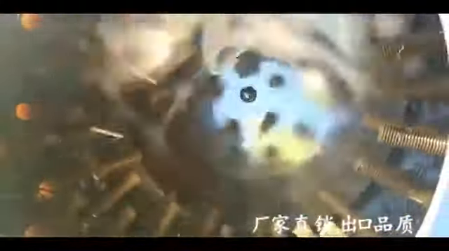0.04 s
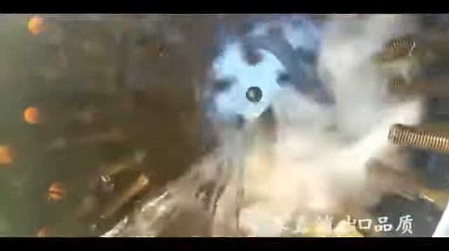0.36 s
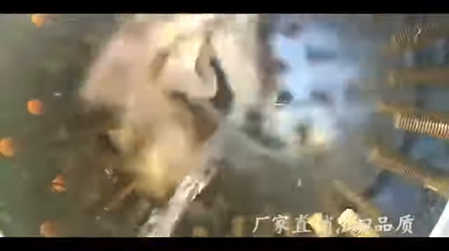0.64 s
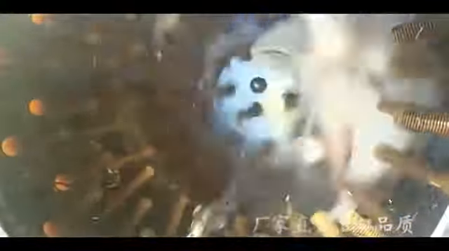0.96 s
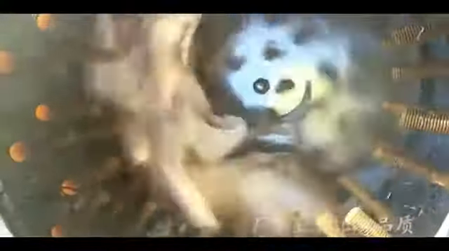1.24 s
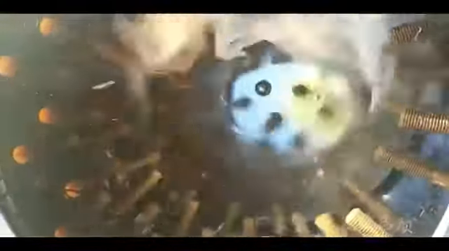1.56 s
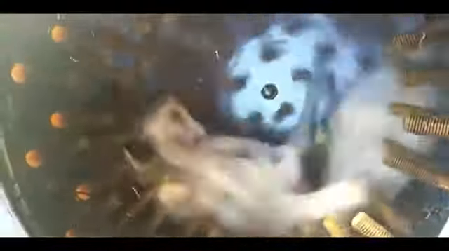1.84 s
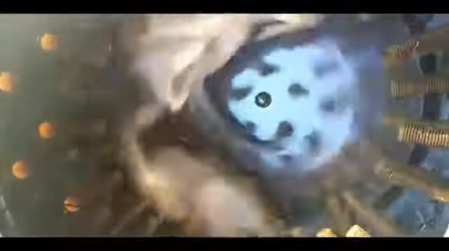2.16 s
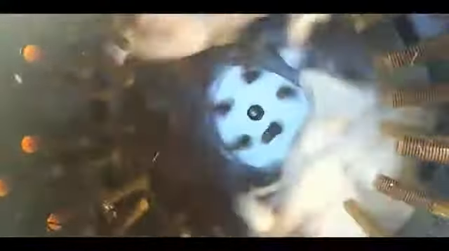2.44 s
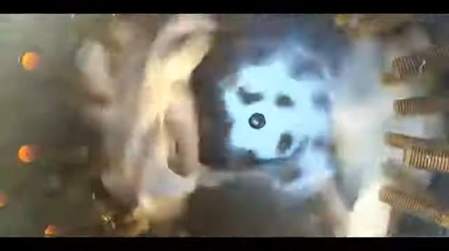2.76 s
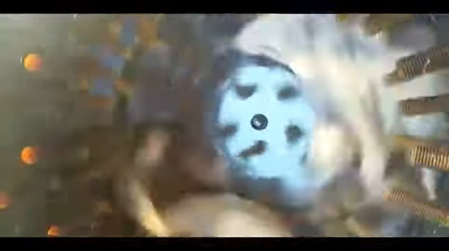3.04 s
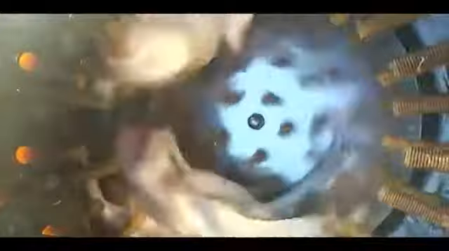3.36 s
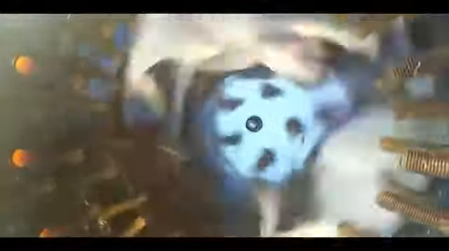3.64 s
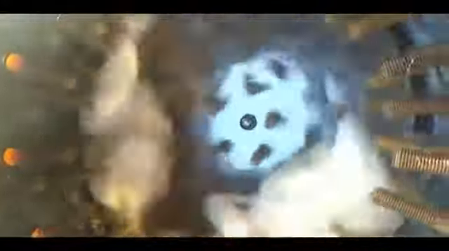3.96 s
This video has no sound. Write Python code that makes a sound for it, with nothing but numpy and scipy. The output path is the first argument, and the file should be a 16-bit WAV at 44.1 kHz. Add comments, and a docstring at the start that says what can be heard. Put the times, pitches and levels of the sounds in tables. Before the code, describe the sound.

A poultry plucker drum spins close by with a throbbing hum and low rumble. Rubber fingers patter and squelch on wet carcasses while water hisses and splats. A knock and brief rubbery groan come near 0.3 seconds, then irregular bumps against the wall. From about 1.8 seconds a hollow, wavering ring grows stronger amid sharp wet smacks. Bumps crowd in again from 2.8 seconds until everything stops at 3.9.

```python
"""Poultry plucker at full speed

Heard from just above the open drum, as the spinning plate throws wet carcasses against rubber fingers.
The drum booms with a throbbing hum and a hollow ring; the fingers patter, squelch and smack on skin,
bodies bump the wall, and water sprays and splats. A limiter holds the peaks; the sound stops dead."""
import sys
import numpy as np
from scipy import signal
from scipy.fft import rfft, irfft, next_fast_len
from scipy.io import wavfile
from scipy.ndimage import uniform_filter1d, minimum_filter1d

SR = 44100
rng = np.random.default_rng(int(sys.argv[2]) if len(sys.argv) > 2 else 0)


def int16_out(signal):
    """Quantize to a 16-bit WAV file."""
    q = np.round(np.clip(np.atleast_2d(signal).T, -1, 1) * 32767)
    wavfile.write(sys.argv[1], SR, q.astype(np.int16))


N = 176400
TIME = np.arange(N) / SR

# How hard the fingers slap. Each row: time in seconds, relative level in dB.
SLAP_FORCE = [(0, -24.5), (.24, -25), (.34, -24), (.42, -23), (.54, -22), (.64, -29.5), (.78, -36),
              (1.06, -18), (1.15, -39), (1.33, -31), (1.5, -24.5), (1.7, -28), (1.97, -22), (2.27, -26),
              (2.44, -22.5), (2.53, -15), (2.68, -25), (2.8, -17.5), (2.93, -24), (3.17, -18.5),
              (3.3, -18.5), (3.42, -22.5), (3.53, -18), (3.88, -26.5)]
# How hard the water splashes off them. Each row: time in seconds, relative level in dB.
SPLASH_FORCE = [(0, -27.5), (.24, -32), (.35, -28.5), (.6, -27), (1.06, -28), (1.18, -30.5), (1.55, -26),
                (1.72, -30.5), (1.97, -26.5), (2.25, -29.5), (2.75, -30), (2.95, -33.5), (3.1, -32),
                (3.27, -32), (3.88, -30)]


def from_db(db):
    """Decibels to gain."""
    return 10 ** (np.asarray(db) / 20)


def rms_one(x):
    """Scale to unit rms."""
    return x / np.sqrt(np.mean(x ** 2) + 1e-20)


def fader(rows):
    """A gain ride through (seconds, dB) points, centred on its mean level."""
    db = np.interp(TIME, *np.transpose(rows))
    return from_db(db - db.mean())


def drift(rate_hz):
    """A smooth random wander with an rms of about 1."""
    step = 40
    pole = np.exp(-2 * np.pi * rate_hz * step / SR)
    noise = rng.standard_normal(N // step + 2002)
    slow = signal.lfilter([1], [1, -2 * pole, pole * pole], noise)[2000:]
    return np.interp(np.arange(N) / step, np.arange(len(slow)), rms_one(slow))


def tone(hz):
    """A sine that follows a pitch curve."""
    return np.sin(2 * np.pi * np.cumsum(hz) / SR)


def coloured(x, colour):
    """Minimum-phase EQ through (Hz, dB) points; keeps the power of white noise."""
    size = next_fast_len(N + SR // 4)
    hz, db = np.transpose(colour)
    bin_hz = np.arange(size // 2 + 1) * SR / size
    gain = rms_one(from_db(np.interp(np.log(bin_hz + 1), np.log(hz), db)))
    cepstrum = irfft(np.log(gain), size)
    cepstrum[1:size // 2] *= 2
    cepstrum[size // 2 + 1:] = 0
    return irfft(rfft(x, size) * np.exp(rfft(cepstrum)), size)[:N]


def contacts(per_s, spread_db):
    """Random touches, mostly light and a few harder."""
    sizes = from_db(spread_db * np.minimum(rng.exponential(1, N), 4))
    return sizes * (rng.random(N) < per_s / SR)


def ringing(hits, modes):
    """Every hit excites each resonance with a strength of its own."""
    out = 0
    for hz, width, db in modes:
        band = signal.butter(1, [hz - width / 2, hz + width / 2], "band", fs=SR, output="sos")
        skirt = signal.butter(1, [hz / np.sqrt(2), hz * np.sqrt(2)], "band", fs=SR, output="sos")
        strikes = hits * rng.standard_normal(N) + 1e-18
        out = out + from_db(db) * rms_one(signal.sosfilt(np.vstack([band, skirt]), strikes))
    return out


def tails(hits, decay_s):
    """Envelope of overlapping, decaying hits; rms 1."""
    power = signal.lfilter([1], [1, -np.exp(-2 / (decay_s * SR))], hits ** 2 + 1e-18)
    return rms_one(np.sqrt(power))


def burst(start, attack_s, decay_s, length=N):
    """Envelope of one blow; peak 1."""
    age = np.maximum(TIME[:length] - start, 0)
    return np.minimum(age / attack_s, 1) * np.exp(-np.maximum(age - attack_s, 0) / decay_s)


def add(out, start_s, sound):
    """Mix a sound in at a time."""
    start = max(int(start_s * SR), 0)
    out[start:start + len(sound)] += sound[:max(N - start, 0)]


def drum():
    """Fingers beat the load and the drum booms; carcasses knock its wall, over a low rumble."""
    # Resonances of the drum and of its wall. Each row: pitch in Hz, width in Hz, level in dB.
    boom_modes = [(129, 29, -23.5), (151.3, 35.5, -20), (190, 19, -20.5), (271.8, 47, -21),
                  (333, 245, -25.5)]
    wall_modes = [(448.2, 39, -28.5), (487.8, 50, -36), (589, 71, -28.5), (685, 56, -29), (903, 61, -34),
                  (1119, 27, -40), (1335, 14, -42.5)]
    # How hard the wall is knocked. Each row: time in seconds, relative level in dB.
    knock_force = [(0, -13.5), (.18, -16.5), (.27, -26), (.36, -2.5), (.42, -18.5), (.62, -14), (.78, -16),
                   (1.1, -13), (1.4, -16), (1.58, -19), (1.66, -11.5), (2.0, -19), (2.25, -14), (2.6, -18),
                   (2.69, -21.5), (2.8, -12.5), (3.16, -15), (3.27, -27), (3.4, -22), (3.65, -20),
                   (3.88, -8.5)]
    # The rumble's EQ. Each row: frequency in Hz, relative level in dB.
    rumble_eq = [(20, 2), (40, -3), (65, -4.5), (100, 10.5), (200, 18.5), (500, -0.5), (2000, -37)]
    boom = ringing(contacts(per_s=500, spread_db=1), boom_modes)
    wall = ringing(contacts(per_s=420, spread_db=0.1), wall_modes) * fader(knock_force)
    rumble = from_db(-31.5 + 2 * drift(5.6)) * coloured(rng.standard_normal(N), rumble_eq)
    return boom + wall + rumble


def hum(level_db=-15.5, jitter_hz=4, flutter_db=3, half_throb_s=0.018):
    """The drum's note swells and bends each time the load leans on the plate."""
    # Each row is one throb: centre in seconds, pitch in Hz, relative level in dB.
    throbs = [(.005, 175, -0.5), (.072, 150, -3), (.164, 166.7, 1), (.217, 152.2, -5), (.37, 178.9, 1),
              (.422, 169.4, 4), (.504, 151.8, 1.5), (.58, 166.7, -3), (.689, 173.3, 1), (.752, 180.4, -1.5),
              (.834, 171.2, -7), (.884, 154, 0), (0.991, 184, -11), (1.054, 162.7, -6), (1.12, 179.7, 3),
              (1.195, 156.8, -1.5), (1.27, 136, -11), (1.342, 161.4, 4.5), (1.4, 181.6, -2),
              (1.475, 163.5, -2), (1.6, 168.4, 0), (1.69, 178, -1), (1.765, 173.3, 4), (1.85, 183.8, -10.5),
              (1.923, 171.9, -0.5), (2.007, 168, -5), (2.126, 172.5, 1), (2.237, 167.7, 0), (2.3, 180, -11),
              (2.38, 167.3, -0.5), (2.438, 176, -2), (2.506, 178.5, 1), (2.569, 165.5, 1),
              (2.639, 167.6, -5), (2.694, 174.6, -3), (2.763, 146, -1.5), (2.833, 173, -4),
              (2.883, 171.8, 6.5), (2.97, 175.1, 0), (3.058, 167.1, 1), (3.106, 172.1, -5),
              (3.15, 148.2, -2), (3.219, 182.3, -1), (3.266, 164, -1.5), (3.34, 170.6, -3),
              (3.396, 172.2, -2.5), (3.487, 151.6, -2.5), (3.531, 181.4, -3), (3.587, 175.3, 2),
              (3.711, 174, -0.5), (3.787, 170.5, -0.5), (3.835, 138, -0.5)]
    times, hz, _ = np.transpose(throbs)
    pitch = np.interp(TIME, times, hz) + jitter_hz * drift(13.8)
    swells = sum(from_db(db) * np.exp(-.5 * ((TIME - at) / half_throb_s) ** 2) for at, _, db in throbs)
    floor = from_db(-18.5)
    flutter = from_db(flutter_db * drift(10.3))
    return from_db(level_db) * rms_one((floor + swells) * flutter * tone(pitch))


def hollow_ring(jitter_hz=36.2, flutter_db=3.5):
    """The air in the drum rings on an unsteady note that shifts as the carcasses move through it."""
    # Each row: time in seconds, pitch in Hz, level in dB.
    ring_path = [(0, 480, -27), (.3, 490, -22), (.55, 479, -41), (.77, 488, -23), (.95, 493, -34),
                 (1.45, 486, -23), (1.58, 490, -37), (1.8, 545, -19.5), (1.95, 500.6, -21),
                 (2.08, 515, -20), (2.189, 530.3, -24.5), (2.251, 547.3, -14.5), (2.34, 493.7, -27.5),
                 (2.41, 532, -16), (2.48, 489.6, -22), (2.6, 490, -14.5), (2.69, 501, -38),
                 (2.74, 502.5, -13.5), (2.85, 510, -38), (2.91, 482, -13), (2.98, 513.3, -22.5),
                 (3.04, 494.2, -24), (3.12, 496.6, -14.5), (3.22, 493.2, -20), (3.29, 575, -24.5),
                 (3.349, 552.5, -23.5), (3.43, 510, -22), (3.6, 475, -20), (3.68, 490, -21),
                 (3.75, 532, -18.5), (3.81, 553, -17.5), (3.9, 530, -26.5)]
    times, hz, db = np.transpose(ring_path)
    pitch = np.interp(TIME, times, hz) + jitter_hz * drift(49.86)
    note = rms_one(from_db(flutter_db * drift(30)) * tone(pitch))
    return from_db(np.interp(TIME, times, db)) * note


def slaps():
    """A dense patter of fingers on skin, each flinging off a brighter splash of drops."""
    # EQs of the slap and the splash. Each row: frequency in Hz, relative level in dB.
    slap_eq = [(200, -5.5), (500, 7), (750, 10.5), (1000, 9.5), (1150, 11.5), (1250, -21), (1330, 5.5),
               (1500, 4), (1800, 9.5), (2200, -11), (2900, -6), (4500, -30.5), (6500, -53), (9000, -49)]
    splash_eq = [(900, -19.5), (2200, -7.5), (2450, -0.5), (2700, -5), (2900, 2), (3400, -5.5), (3530, -23),
                 (3630, -28), (3730, -17.5), (3900, -3), (4400, -0.5), (4550, -10.5), (5200, -4),
                 (6300, -25), (8000, -24), (11000, -13), (14000, -14.5)]
    hits = contacts(per_s=170, spread_db=3)
    slap = from_db(-32.5) * tails(hits, decay_s=0.017) * fader(SLAP_FORCE)
    wet_hits = hits * from_db(1.7 * drift(32))
    splash = from_db(-32) * tails(wet_hits, decay_s=0.021) * fader(SPLASH_FORCE)
    drops = rms_one(contacts(per_s=9000, spread_db=2) * rng.standard_normal(N))
    return coloured(slap * rng.standard_normal(N), slap_eq) + coloured(splash * drops, splash_eq)


def spray(level_db=-30, flicker_db=0.5):
    """Fine water hisses against the steel."""
    # How hard the water sprays. Each row: time in seconds, relative level in dB.
    spray_force = [(0.0, -28.5), (0.03, -32), (1.08, -28.5), (1.37, -33), (1.58, -29), (2.66, -33),
                   (2.88, -27.5), (2.94, -34), (3.09, -28), (3.12, -32), (3.2, -37), (3.24, -33),
                   (3.88, -31.5)]
    # The hiss's EQ. Each row: frequency in Hz, relative level in dB.
    hiss_eq = [(1000, 4.5), (5000, 2), (6500, -3), (7800, -11), (8700, -12), (9600, -5), (10300, -5.5),
               (11500, 0), (14000, -2.5)]
    level = from_db(level_db + flicker_db * drift(60)) * fader(spray_force)
    return coloured(level * rng.standard_normal(N), hiss_eq)


def squelch(hz, octaves, attack_s, decay_s):
    """A short wet burst ringing in a pocket of skin and rubber; rms about 1 at its height."""
    envelope = burst(0, attack_s, decay_s, length=SR // 10)
    pole = np.exp(-np.pi * hz * octaves * np.log(2) / SR)
    pocket = [1, 0, -0.963], [1, -2 * pole * np.cos(2 * np.pi * hz / SR), pole * pole]
    puff = envelope * rng.standard_normal(len(envelope))
    sound = signal.lfilter(*pocket, signal.lfilter(*pocket, puff))
    return rms_one(sound) * np.sqrt(np.mean(envelope ** 2))


def small_squelches(per_s=260):
    """Fingers tug at wet skin: a bed of squelches that rides with the slapping and splashing."""
    # Each row: pitch in Hz, base level in dB.
    level_by_pitch = [(700, -25), (1100, -27.5), (1500, -28), (2200, -38), (2900, -33), (4300, -39),
                      (5300, -38), (6500, -43)]
    pitches, levels = np.transpose(level_by_pitch)
    effort = np.sqrt(fader(SLAP_FORCE) * fader(SPLASH_FORCE))
    out = np.zeros(N)
    for start in np.flatnonzero(rng.random(N) < per_s / SR):
        hz = rng.uniform(np.sqrt(pitches[0]), np.sqrt(pitches[-1])) ** 2  # favours low pitches
        db = np.interp(hz, pitches, levels) + 2.5 * rng.uniform(-1.7, 1)
        tug = squelch(hz, octaves=0.14, attack_s=0.0048, decay_s=0.016)
        add(out, start / SR, from_db(db) * effort[start] * tug)
    return out


def bumps(attack_s=0.0038, decay_cycles=5.5):
    """Bodies bump the wall, soft and heavy: a brief ring and a dull thud of flesh."""
    # Each row: start in seconds, pitch in Hz, base level in dB.
    blows = [(.234, 542, -7), (.349, 878, -8), (0.477, 329.5, -9.5), (0.551, 267, -15), (.632, 276, -15),
             (0.714, 265, -8.5), (.79, 270, -9.5), (.854, 820, -12), (0.917, 428, -9.5), (1.036, 283, -17),
             (1.284, 275, -9.5), (1.305, 680, -9.5), (1.381, 805.4, -14), (1.496, 763, -12.5),
             (1.861, 710, -10.5), (2.163, 676, -11), (2.77, 294.4, -8.5), (2.836, 479.5, -9),
             (2.970, 539, -9.5), (3.169, 880, -13.5), (3.335, 586, -10), (3.413, 518.2, -8.5),
             (3.428, 670.6, -10), (3.83, 634, -15), (3.862, 670, -13), (3.674, 263.4, -7),
             (3.705, 939, -14.5), (3.798, 592.6, -15), (3.884, 705, -9), (3.894, 45.1, -12.5)]
    out = np.zeros(N)
    for start, hz, db in blows:
        ring = burst(start, attack_s, decay_cycles / hz) * np.sin(2 * np.pi * hz * (TIME - start))
        thud = squelch(hz, octaves=1.14, attack_s=attack_s, decay_s=0.026)
        out += from_db(db + 1) * ring
        add(out, start, from_db(db - 13) * thud)
    return out


def drag(jitter_hz=60, flutter_db=6.5):
    """A carcass sticks and slips over the rubber fingers: a short, rough, rising groan."""
    # Each row: time in seconds, pitch in Hz, level in dB.
    groan_path = [(.25, 564.4, -44), (.275, 607, -11.5), (.3, 631, -18), (0.319, 679, -19.5),
                  (.345, 790, -19), (.365, 914, -36), (.39, 970, -62)]
    times, hz, db = np.transpose(groan_path)
    pitch = np.interp(TIME, times, hz) + jitter_hz * drift(86)
    level = from_db(np.interp(TIME, times, db) + flutter_db * drift(90))
    touching = (TIME > times[0]) & (TIME < times[-1])
    return level * touching * tone(pitch)


def smacks():
    """The loudest tugs at wet skin snap out as single smacks, each at its own pitch."""
    # Each row: start in seconds, pitch in Hz, width in octaves, level in dB.
    tugs = [(0.311, 1880, 0.55, -21.5), (0.358, 1290, 0.099, -16), (.585, 2500, .9, -27),
            (0.859, 1199, 0.89, -22), (1.011, 2240, 0.53, -22), (1.275, 1140, 0.13, -21),
            (1.415, 1230, 0.27, -15.5), (1.539, 1300, 0.19, -18.5), (1.787, 1179, 0.16, -18.5),
            (1.873, 1996, 0.87, -20.5), (1.926, 1450, 0.19, -13), (1.928, 2880, 0.38, -21.5),
            (1.957, 1700, 0.62, -22.5), (1.978, 2190, 1.02, -25), (2.051, 1389, 0.17, -17.5),
            (2.06, 2600, 0.77, -23), (2.322, 1609, 0.9, -21.5), (2.512, 1600, 1.2, -18),
            (2.584, 2039, 1.1, -16), (2.775, 1363, 0.15, -18), (3.04, 2090, 1.56, -17),
            (3.078, 3313, 0.88, -26), (3.123, 1695, 0.74, -19.5), (3.164, 1295, 0.35, -19),
            (3.238, 1427, 0.34, -20), (3.351, 1760, 0.69, -20.5), (3.492, 1467, .3, -14.5),
            (3.755, 1290, 0.27, -19)]
    out = np.zeros(N)
    for start, hz, octaves, db in tugs:
        add(out, start, from_db(db) * squelch(hz, octaves, attack_s=0.0046, decay_s=0.0056))
    return out


def splats(attack_s=0.0082, decay_s=0.0091):
    """Each clump of water hits the wall as a short shower of big and fine drops."""
    # Each row: start in seconds, level of the big drops in dB, level of the fine drops in dB.
    clumps = [(.338, -24, -34), (.481, -20, -34), (.519, -24, -32), (.603, -30, -31), (0.658, -22.5, -30),
              (.708, -24, -27), (.81, -27, -26), (.942, -31, -35), (1.071, -33.5, -21), (1.086, -23, -33),
              (1.324, -22.5, -44), (1.541, -28, -29), (1.81, -24.5, -28), (2.105, -24, -36),
              (2.334, -24.5, -37), (2.742, -27, -38), (2.858, -23, -29), (3.16, -22, -44), (3.3, -29, -42),
              (3.654, -35.5, -21), (3.688, -22, -37), (3.837, -24, -45)]
    # EQs of the two drop sizes. Each row: frequency in Hz, relative level in dB.
    big_eq = [(1200, -18), (2300, 1), (3000, 2.5), (4200, -2), (5200, -11), (8000, -34)]
    fine_eq = [(2500, -21.5), (4200, -3.5), (5200, 4.5), (6400, -6), (8000, -17.5), (12000, -17.5)]
    starts, big_db, fine_db = np.transpose(clumps)
    out = np.zeros(N)
    for levels, eq in ((big_db, big_eq), (fine_db, fine_eq)):
        envelope = sum(from_db(db) * burst(at, attack_s, decay_s) for at, db in zip(starts, levels))
        drops = rms_one(contacts(per_s=7000, spread_db=4.9) * rng.choice([-1, 1], N))
        out += coloured(envelope * drops, eq)
    return out


def scene():
    """Drum, bodies and wet layers at one close microphone."""
    machine = drum() + hum() + hollow_ring()
    bodies = bumps() + drag()
    wet = slaps() + splats() + spray() + smacks() + small_squelches()
    return (machine + bodies + wet)[None]


def record(dry):
    """A fast look-ahead limiter, the dead stop and a steep low-pass."""
    threshold_db, cut_per_db, release_db_per_s, window_s = -4, 0.84, 235, 0.0026
    stop_s, cutoff_hz = 3.916, 14050
    level_db = 20 * np.log10(np.abs(dry[0]) + 1e-9)
    cut_db = cut_per_db * np.maximum(level_db - threshold_db, 0)
    release_db = release_db_per_s * TIME
    held_db = np.maximum.accumulate(cut_db + release_db) - release_db
    window = 2 * int(window_s * SR / 2) + 1
    gain = from_db(uniform_filter1d(minimum_filter1d(-held_db, window), window))
    low_pass = signal.ellip(12, .1, 80, cutoff_hz, fs=SR, output="sos")
    return signal.sosfilt(low_pass, dry * gain * (TIME < stop_s))


dry = scene()
out = record(dry)
int16_out(out)
```